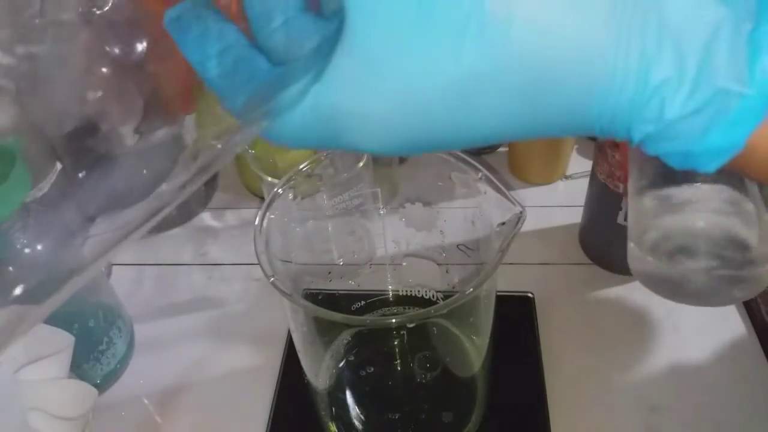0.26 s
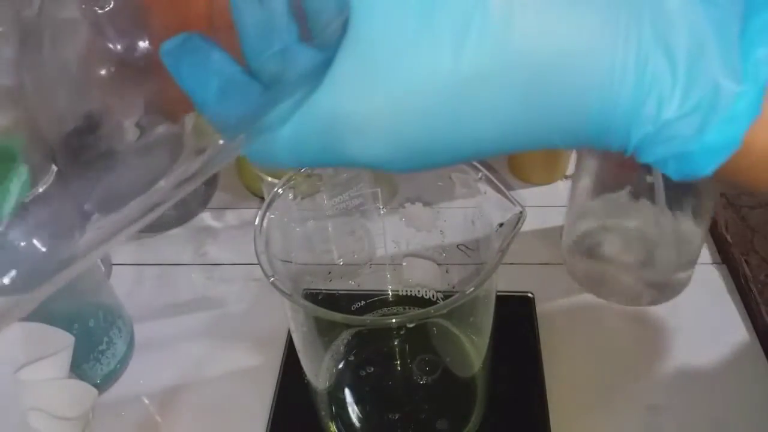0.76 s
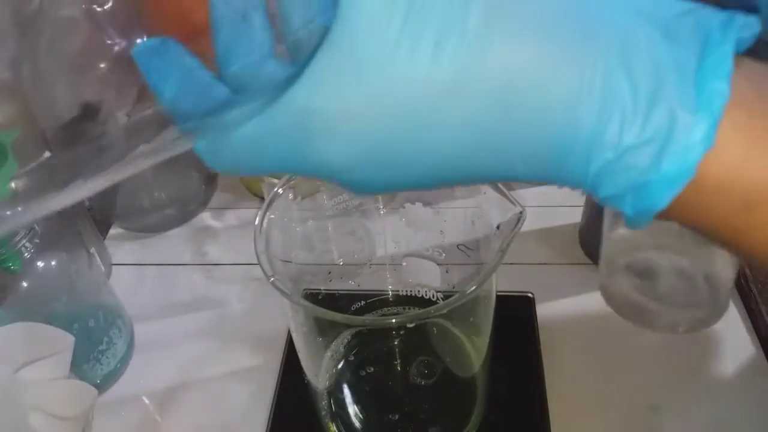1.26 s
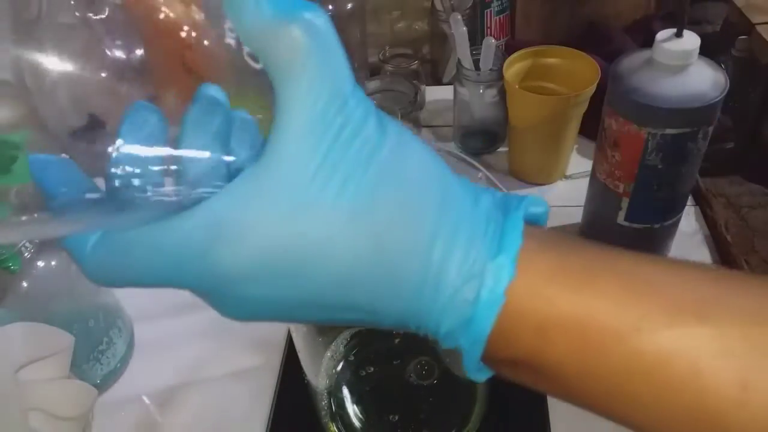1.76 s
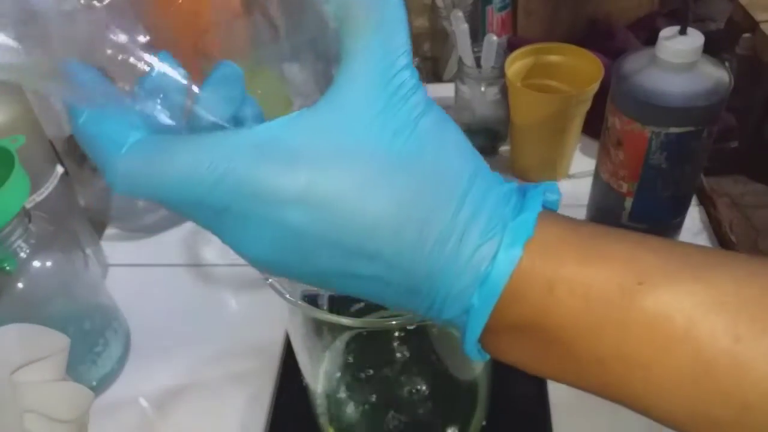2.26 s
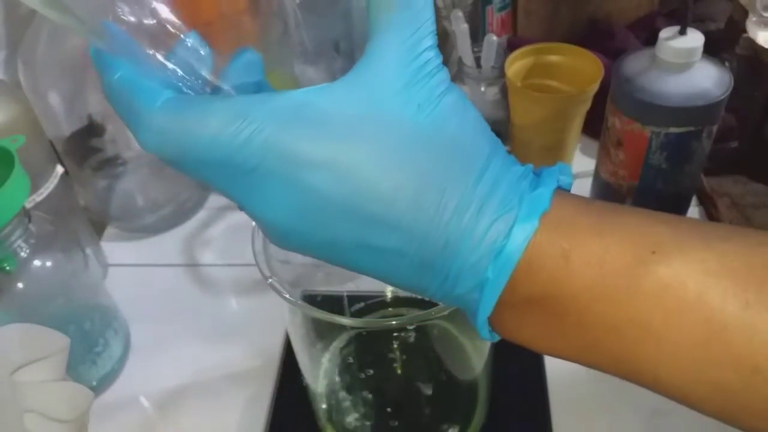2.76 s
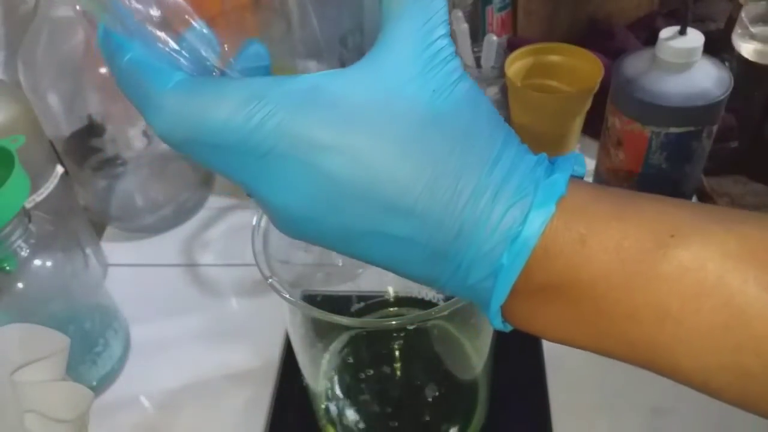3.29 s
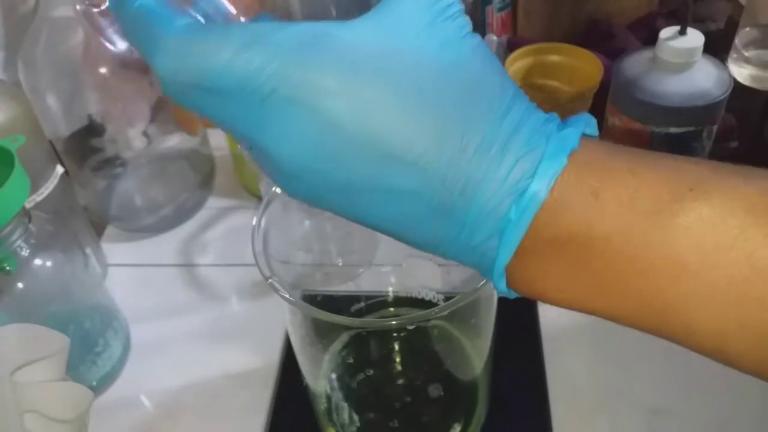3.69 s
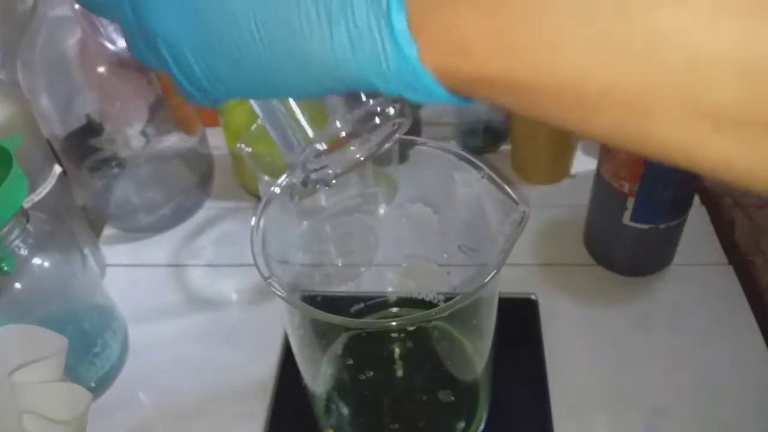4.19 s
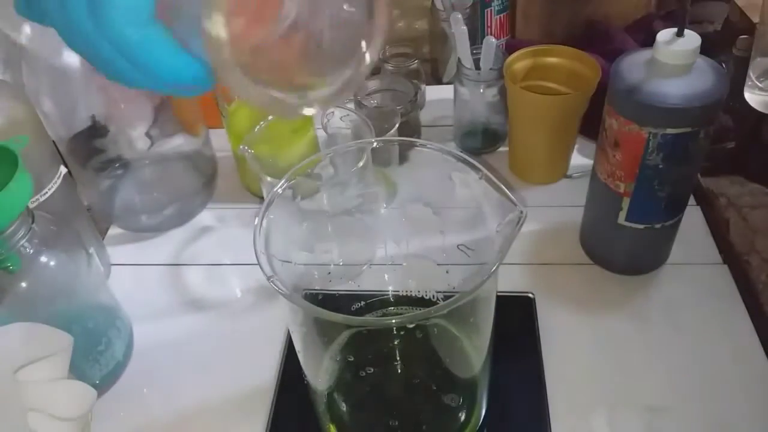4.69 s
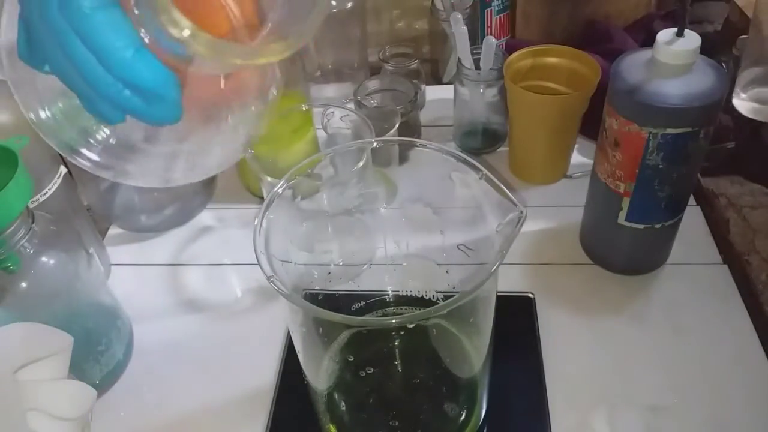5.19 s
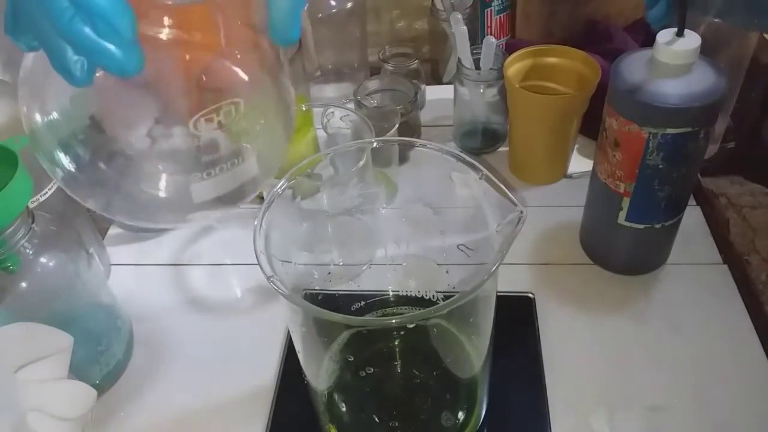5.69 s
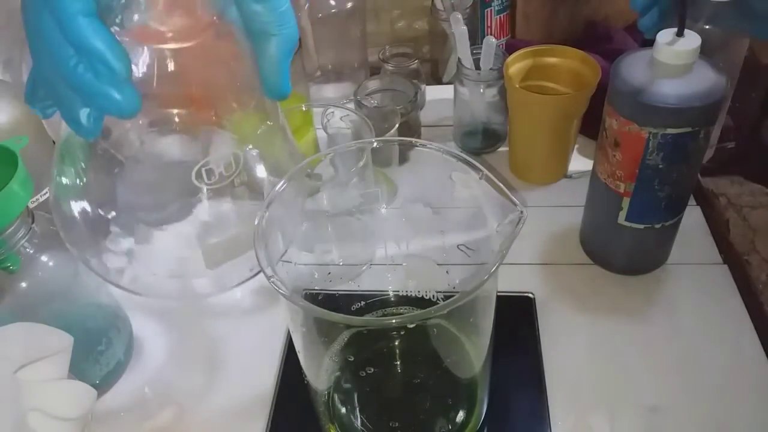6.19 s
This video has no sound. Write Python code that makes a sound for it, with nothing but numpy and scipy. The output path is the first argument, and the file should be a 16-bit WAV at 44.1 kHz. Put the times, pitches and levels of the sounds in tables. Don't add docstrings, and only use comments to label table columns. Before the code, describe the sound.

Glassy swirling clatter with wet slaps, a short splash of poured liquid, sparse drips, then a glass flask knocks down with a ringing rattle.

```python
import sys
import numpy as np
from scipy import signal
from scipy.fft import rfft, irfft, next_fast_len
from scipy.io import wavfile
from scipy.ndimage import map_coordinates

SR = 44100
rng = np.random.default_rng(int(sys.argv[2]) if len(sys.argv) > 2 else 0)


def generate_wav(sig):
    pcm = np.round(np.clip(np.atleast_2d(sig).T, -1, 1) * 32767).astype(np.int16)
    wavfile.write(sys.argv[1], SR, pcm)


def rack_gain(trim_db):
    fader = np.asarray(trim_db, float)
    return 10 ** (fader / 20)


N = 284445


def unit(x):
    return x / np.sqrt(np.mean(x ** 2) + 1e-20)


def along(points, hz):
    f, v = np.transpose(points)
    return np.interp(np.log(hz + 1), np.log(f + 1), v)


def curves(rows):
    s, *cols = np.transpose(rows)
    return [np.interp(np.arange(N) / SR, s, c) for c in cols]


def wobble(rate, count=N):
    knots = rng.standard_normal(int(count * rate / SR) + 4)
    return map_coordinates(knots, [np.arange(count) * rate / SR])


def hiss(gain, count=N, gate=1, clicks=0):
    m = next_fast_len(count)
    source = rng.standard_normal(count) * gate + clicks
    spectrum = rfft(source, m) * gain(np.fft.rfftfreq(m, 1 / SR))
    return unit(irfft(spectrum, m)[:count])


def band(hz, width, count=N):
    return hiss(lambda f: np.exp(-((f - hz) / width) ** 2), count=count)


def sine(hz, t):
    return np.sin(2 * np.pi * hz * t)


def sweep(hz):
    return np.sin(2 * np.pi * np.cumsum(hz) / SR)


def fade(t, rise, t60):
    return (1 - np.exp(-t / max(rise, 1e-4))) * rack_gain(-60 * t / max(t60, .005))


def add(track, s, x):
    k = round(s * SR)
    x = x[max(-k, 0):N - k]
    track[max(k, 0):][:len(x)] += x


def ring(pitches, modes, t, stop, rough):
    whole = len(t)
    t = t[t < stop + .04]
    tone = np.zeros(len(t))
    for hz, (db, t60) in zip(pitches, modes):
        flutter = wobble(49.4, count=len(t)) + 0.56 * wobble(279, count=len(t))
        shake = 1 + rough * np.sqrt(hz / 3000) * flutter
        tone += rack_gain(db - 60 * t / t60) * shake * np.sin(2 * np.pi * (hz * t + rng.random()))
    mute = rack_gain(-60 * np.maximum(t - stop, 0) / 0.026)
    return np.pad(tone * mute, (0, whole - len(t)))


def echoes(x, decay):
    hz, t, z = signal.stft(rng.standard_normal(SR // 2), SR, nperseg=256)
    dying = z * rack_gain(-60 * t / along(decay, hz)[:, None])
    tail = signal.istft(dying, SR, nperseg=256)[1]
    return signal.fftconvolve(np.pad(x, (150, 0)), tail / np.linalg.norm(tail))[:N]


# start in seconds, length in seconds, level in dB, bounces in Hz.
ROD_CHATTER = [
    (-.05, 0.038, -10, 446),
    (0.21, 0.029, -11.5, 437),
    (0.478, 0.036, -11.5, 439.3),
    (0.748, 0.024, -11.5, 434.7),
    (0.991, 0.027, -11.5, 436.4),
]
# frequency in Hz, density in dB per Hz.
BUZZ_COLOUR = [(290, -58), (500, -27.5), (1280, -19.5), (2360, -9.5), (2610, -10.5), (3250, -12.5),
               (4800, -3), (7980, -5), (9360, -19.5), (11800, -4.5), (16000, -18.5)]
# frequency in Hz, width in Hz, boost in dB.
WALL_MODES = [(1331, 90, 5.5), (2620, 120, 9), (4400, 200, 5), (5040, 200, 5.5), (6020, 250, 4.5),
              (7045, 190, 4), (7800, 280, 5.5)]


def rod_chatter():
    out, t = np.zeros(N), np.arange(SR // 5) / SR

    def colour(f):
        return rack_gain(along(BUZZ_COLOUR, f))

    def glass(f):
        return 1 + sum(rack_gain(g) * 1j * f * w / (c * c - f * f + 1j * f * w) for c, w, g in WALL_MODES)

    for s, length, db, hz in ROD_CHATTER:
        since = (t * hz + 0.066 * wobble(60, count=len(t))) % 1 / hz
        bounce = .4 + np.exp(-since / .0007)
        contacts = np.diff(since, prepend=0) < 0
        click = 2 * (t == 0) + rng.standard_normal(len(t)) * np.exp(-t / .0012)
        clicks = 2.2 * signal.fftconvolve(contacts, click)[:len(t)]
        shape = (1 - np.exp(-(t / 0.011) ** 3.0)) * rack_gain(-60 * np.maximum(t - length, 0) / 0.047)
        buzz = shape * hiss(lambda f: colour(f) * glass(f), count=len(t), gate=bounce, clicks=clicks)
        tail = rack_gain(2.5) * fade(t, length, 0.17) * np.minimum(t / length, 1)
        add(out, s, rack_gain(db) * (buzz + tail * hiss(colour, count=len(t))))
    return out


# start in seconds, level in dB of the 1.3 kHz, 2.6 kHz, 4-5 kHz
# and 7 kHz-and-up families, share of full ring life.
BEAKER_RINGS = [(-.02, -42, -25.5, -23, -19.5, 1.03), (0.119, -32.5, -22.5, -23, -33, 0.39),
                (.164, -38, -42, -53, -50, 0.6), (0.236, -25, -18, -14.5, -18.5, 1.07),
                (.396, -35, -49, -53, -42, 1.1), (0.434, -42, -46, -53, -50, 0.72),
                (.502, -39.5, -42, -63, -31, 1.3), (.65, -40, -45, -55, -50, 0.29),
                (0.706, -40, -45.5, -55, -50, 0.47), (.778, -38, -25.5, -21, -19.5, 1.08),
                (0.896, -40, -42, -55, -51, 0.34), (.955, -42.5, -42.5, -55, -49, 0.36),
                (1.01, -25.5, -25.5, -14.5, -14.5, 1.11), (1.14, -40.5, -40, -54.5, -49.5, 0.41)]
BEAKER_HZ = [1324, 1588, 2620, 2650, 4300, 4400, 4452, 4600, 5040, 5206, 6790, 6900, 7045, 7870, 10090,
             11000, 11950, 13480, 14130, 14850]
BEAKER_FAMILY = [0, 0, 1, 1, 2, 2, 2, 2, 2, 2, 3, 3, 3, 3, 3, 3, 3, 3, 3, 3]
# level in dB, t60 in seconds.
BEAKER_MODES = [(-2, 0.64), (-13.5, 0.51), (2.5, 0.51), (-0.5, 0.14), (1, 0.12), (-3, 0.25), (-3.5, 0.21),
                (-9, 0.51), (2, 0.24), (-29, .2), (-6.5, 0.42), (-11, 0.19), (2.5, 0.22), (-20, 0.15),
                (-20, 0.3), (-18.5, 0.12), (-19, 0.25), (-13, 0.21), (-18, 0.24), (-13, 0.24)]


def beaker_ring():
    out, t = np.zeros(N), np.arange(SR // 5) / SR
    ticks, sloshes, knocks = WALL_SLAPS
    heavy = sloshes + knocks + ROD_CHATTER
    low, high = slice(0, 4), slice(4, None)
    for s, *family_db, share in BEAKER_RINGS:
        modes = []
        for (db, t60), k in zip(BEAKER_MODES, BEAKER_FAMILY):
            modes.append((db + family_db[k] + rng.normal(0, 0.37), t60 * share))
        for part, hits, rough in [(low, heavy, .55), (high, heavy + ticks, .7)]:
            stop = min([hit[0] for hit in hits if hit[0] > s + .005], default=N / SR) - .004
            tone = ring(BEAKER_HZ[part], modes[part], t, stop - s, rough)
            add(out, s, tone * (1 - np.exp(-t / 0.007)))
    return out


# time in seconds, level in dB.
AIR_LEVEL = [(0, -54), (1.2, -56), (1.8, -58.5), (5.8, -60), (6.45, -55.5)]
# frequency in Hz, density in dB.
AIR_COLOUR = [(100, -25), (170, 5.5), (205, -3.5), (355, -2), (3230, -22.5), (3830, -13), (5920, -15.5),
              (6630, -12), (8470, -22), (9310, -55), (11000, -13), (15500, -29)]


def room_air():
    return rack_gain(curves(AIR_LEVEL)[0] + 0.27 * wobble(5.5)) * hiss(lambda f: rack_gain(along(AIR_COLOUR, f)))


# frequency in Hz, density in dB per Hz.
RUMBLE_COLOUR = [(25, -58), (38, -23), (55, -6), (90, 3), (150, -7), (190, -32.5)]


def traffic_rumble():
    return rack_gain(-51 + 0.38 * wobble(3.88)) * hiss(lambda f: rack_gain(along(RUMBLE_COLOUR, f)))


# centre in Hz, width in Hz, level in dB.
INSECT_BANDS = [(6686, 100, -58), (6550, 340, -59.5), (8110, 500, -58), (11000, 720, -65.5),
                (7500, 650, -65)]
# time in seconds, level in dB.
NEAR_SONG = [(1.39, -61), (1.762, -58.5), (1.95, -77), (2.4, -67.5), (2.78, -58.5), (3.45, -65),
             (3.97, -70), (4.45, -61), (5.9, -64)]


def insects():
    out = np.zeros(N)
    near_db = curves(NEAR_SONG)[0]
    swell = [near_db - near_db.mean(), 0, 0, 0, 0]
    for (hz, width, db), more_db in zip(INSECT_BANDS, swell):
        out += rack_gain(db + more_db + 1.5 * wobble(40)) * band(hz, width)
    return out


def refrigerator():
    hum_hz, hum_db = 120, -49
    phase = 2 * np.pi * hum_hz * np.arange(N) / SR + 0.36 * wobble(6.2)
    return rack_gain(hum_db + 1.8 * wobble(6)) * np.sin(phase)


# time in seconds, firing rate in Hz, level in dB.
ENGINE_REVS = [(0, 40.55, -65), (.6, 45.95, -54), (1.3, 54.03, -54), (1.95, 62.2, -45.5),
               (2.4, 65.86, -47.5), (3.1, 73, -55), (3.7, 79.6, -47), (4.05, 82.55, -48), (4.4, 76.9, -59),
               (4.8, 68.54, -57.5), (5.3, 59.4, -58), (6.45, 59, -68)]


def far_engine():
    hz, db = curves(ENGINE_REVS)
    phase = 2 * np.pi * np.cumsum(hz) / SR + .5 * wobble(7)
    return rack_gain(db) * rack_gain(2 + 3 * wobble(12)) * np.sin(phase)


# start in seconds, level in dB, brightness in dB.
WALL_SLAPS = [
    [(.067, -19, 2), (.074, -8, 2.5), (.161, -16, 3), (.942, -10, 6), (.12, -29, 12.5), (.185, -30, -13),
     (.338, -15, -3), (.613, -22, -4.5), (.861, -21, 3), (1.114, -6, 1)],
    [(.082, -7.5, -0.5), (.353, -7, 1), (.626, -6, 2), (.875, -4, 5.5), (.948, -13, -9), (1.123, -7, -1)],
    [(.092, -9, 0), (.16, -20, 8.5), (.364, -11, 0), (.429, -16, -0.5), (.643, -12, 2.1), (.7, -15, 0.5),
     (.887, -10.5, -2), (.942, -11.5, 5), (1.136, -7, 1)],
]
# rise in seconds, t60 in seconds, low knock in dB.
SLAP_KINDS = [
    (0.00066, .018, -38),
    (0.0062, 0.062, -22.5),
    (0.00015, 0.051, -6),
]
# frequency in Hz, density in dB per Hz.
WET_COLOUR = [(470, -43), (800, -29.5), (2440, -6.5), (2950, -14.5), (3740, -2), (5050, -7), (6020, -3.5),
              (8770, -17), (13400, -10), (16000, -23)]
# frequency in Hz, density in dB per Hz.
KNOCK_COLOUR = [(100, -64), (200, -15), (400, -3), (800, 1.5), (2000, 0.5), (3000, 0), (5000, -12)]


def wall_slaps():
    out, t = np.zeros(N), np.arange(SR // 5) / SR
    for hits, (rise, t60, knock_db) in zip(WALL_SLAPS, SLAP_KINDS):
        for s, db, bright_db in hits:
            tilt = lambda f: bright_db * np.log2(f / 5000 + 0.24)
            wet = hiss(lambda f: rack_gain(along(WET_COLOUR, f) + tilt(f)), count=len(t))
            wet = wet * rack_gain(0.88 * wobble(550, count=len(t)))
            knock = rack_gain(knock_db) * hiss(lambda f: rack_gain(along(KNOCK_COLOUR, f)), count=len(t))
            add(out, s, rack_gain(db) * fade(t, rise, t60) * (wet + knock))
    return out


# start in
# seconds, pitch in Hz, level in dB.
SLOW_GULPS = [(.631, 3700, -16), (.881, 3500, -16), (.949, 3250, -10), (.951, 3400, -15),
              (1.127, 3800, -14), (.433, 3000, -23), (2.018, 3350, -15), (.36, 5900, -18),
              (.068, 6050, -19), (.087, 3700, -17), (.085, 6000, -17), (.097, 2050, -20),
              (.887, 1950, -19)]
# start in seconds, pitch in Hz, level in dB, t60 in seconds.
GUSH_BUBBLES = [(2.024, 800, -25, 0.049), (2.037, 5000, -19.5, 0.022), (2.037, 1620, -27.5, 0.063),
                (2.041, 3370, -17.5, 0.044), (2.051, 1060, -16.5, 0.036), (2.056, 2216, -24.5, 0.039),
                (2.088, 3320, -15.5, 0.039), (2.09, 2780, -23, 0.038), (2.088, 1586, -24, 0.02),
                (2.09, 4180, -24, 0.029), (2.17, 3660, -46, 0.019), (2.215, 2106, -26.5, 0.048),
                (2.218, 3020, -37, 0.055), (2.214, 1540, -30, 0.03), (2.215, 2857, -30.5, 0.067),
                (2.215, 4410, -42.5, 0.11), (2.262, 2060, -34, 0.048), (2.332, 2090, -39, 0.05),
                (2.024, 1050, -34.5, .03), (2.05, 700, -32, .04)]
# start in seconds, pitch in Hz, level in dB, t60 in seconds.
THIN_DRIPS = [(2.554, 1333, -57, 0.07), (2.583, 1390, -43.5, 0.053), (2.585, 3550, -52, 0.2),
              (2.2, 4900, -59, 0.33), (2.639, 1667, -39.5, 0.22), (2.637, 2100, -45, .05),
              (2.781, 2770, -35.5, 0.073), (2.836, 2700, -42, .046), (2.902, 2346, -43.5, 0.13),
              (2.901, 2747, -44, 0.13), (2.956, 2217, -29.5, 0.062), (2.96, 2734, -39.5, 0.11),
              (2.965, 2330, -42.5, 0.19), (2.962, 4890, -42.5, 0.22), (3.038, 2396, -48, 0.19),
              (3.125, 2120, -57, .07), (2.985, 3500, -52, .06), (3.09, 2800, -56, .06),
              (2.905, 1600, -54, .05), (3.2, 3400, -54, .05), (3.152, 2176, -47, 0.069),
              (3.2, 5900, -54, .1), (3.04, 5900, -56, 0.16), (2.82, 4130, -58, .1), (3, 3850, -48, 0.074),
              (3.195, 4800, -50, 0.084), (3.193, 2745, -42, 0.1), (3.195, 2900, -49, 0.055),
              (3.251, 3900, -51, 0.096), (3.3, 4250, -56, 0.1), (3.41, 1370, -61, 0.29),
              (3.455, 1890, -64, .15), (2.86, 3100, -56, .1), (4.1, 3670, -40.5, 0.13),
              (4.559, 1703, -55.5, 0.089)]
# rise in seconds, pitch gain as a share.
POCKET_KINDS = [
    (.001, 0.032),
    (.002, 0.017),
    (.003, .017),
]


def bubbles():
    out, t = np.zeros(N), np.arange(SR // 3) / SR
    gulps = [gulp + (0.038,) for gulp in SLOW_GULPS]
    for rows, (rise, gain) in zip((GUSH_BUBBLES, THIN_DRIPS, gulps), POCKET_KINDS):
        for s, hz, db, t60 in rows:
            creep = gain * np.minimum(3 * t / t60, 2) - gain / 2
            pitch = hz * (1 + creep + .011 * wobble(150, count=len(t)))
            tone = sweep(pitch) * rack_gain(2.5 * wobble(200, count=len(t)))
            collapse = rack_gain(db + 5.0 - 60 * (t / t60) ** 1.6)
            add(out, s, collapse * fade(t, rise, 1.46 * t60) * tone)
    return out


# start in seconds, end in seconds, centre in Hz, width
# in Hz, level in dB.
FAINT_NOISES = [(1.38, 1.593, 535, 14, -59), (1.36, 1.85, 4170, 90, -61), (1.99, 2.384, 350, 420, -53),
                (2.24, 2.44, 4600, 50, -62), (2.38, 2.58, 4510, 50, -62), (3.7, 4.48, 356, 200, -60.5),
                (4.7, 5.94, 666.7, 125, -66.5), (5.4, 5.562, 794, 55, -53.5), (6.2, 6.34, 300, 150, -45),
                (2.943, 3.1, 4700, 350, -55), (2.5, 2.79, 804, 36, -61.5), (3.36, 3.5, 5050, 350, -59),
                (2.52, 2.73, 4310, 45, -62), (2.0, 2.3, 160, 40, -52), (5.635, 5.67, 7000, 500, -55),
                (2.28, 2.4, 1000, 350, -56), (3.0, 3.2, 350, 80, -60), (.8, 1.25, 140, 30, -56)]


def faint_noises():
    out = np.zeros(N)
    for s, end, hz, width, db in FAINT_NOISES:
        swell = np.sqrt(np.hanning(round((end - s) * SR)))
        level = rack_gain(db + 3.0 * wobble(35.0, count=len(swell)))
        add(out, s, level * swell * band(hz, width, count=len(swell)))
    return out


# start in seconds, centre in Hz, level in dB, t60 in seconds.
DROP_SPRAY = [(2.014, 6000, -31.5, 0.093), (2.038, 4330, -24, 0.1), (2.03, 620, -29.5, 0.092),
              (2.052, 1780, -31.5, 0.12), (2.084, 7500, -31, 0.087), (2.088, 4480, -27, 0.044),
              (2.204, 7740, -31, 0.08), (2.214, 2680, -34, 0.092), (2.225, 7500, -21.5, 0.042),
              (2.262, 3280, -50, 0.23), (2.313, 11200, -38.5, 0.055), (2.329, 4900, -33, 0.089),
              (2.357, 14500, -41.5, 0.06), (2.585, 3600, -51, 0.18), (2.641, 9000, -55, 0.15),
              (2.662, 10000, -43, 0.059), (2.129, 6840, -34.5, 0.055), (2.836, 7200, -41.5, 0.077),
              (2.82, 3800, -54, 0.21), (2.9, 1620, -51.5, 0.12), (2.958, 3750, -43.5, 0.15),
              (3.039, 5950, -52, 0.15), (3.194, 4130, -45, 0.22), (4.1, 3450, -48, 0.11),
              (4.559, 3020, -51.5, 0.06), (2.212, 1100, -41, 0.092), (2.216, 2000, -38, 0.076),
              (2.262, 1910, -38.5, .07), (2.09, 984, -38.5, 0.051), (2.062, 3000, -34, .1),
              (2.79, 2660, -50.5, 0.23), (2.96, 2370, -43, 0.25), (3.04, 2600, -47.5, 0.13),
              (2.64, 1580, -46, .15), (3.255, 4500, -50, 0.17), (4.559, 1300, -52, 0.073)]


def spray():
    out, t = np.zeros(N), np.arange(SR // 3) / SR
    for s, hz, db, t60 in DROP_SPRAY:
        bell = lambda f: np.exp(-(np.log2(f / hz + 1e-9) / 0.25) ** 2)
        burst = hiss(lambda f: 0.44 * rack_gain(along(WET_COLOUR, f)) + bell(f), count=len(t))
        add(out, s, rack_gain(db + 2.0 * wobble(520, count=len(t))) * fade(t, 0.00057, t60) * burst)
        for late, tone, size in rng.random((9, 3)):
            tiny_hz = min(hz, 4500) * 2 ** (1.375 * tone - .9)
            tiny = fade(t, 0.0012, 60 / tiny_hz) * sine(tiny_hz, t * (1 + 3 * t))
            add(out, s + late ** 2 * t60, rack_gain(db + 1 - 25.0 * size - 14.4 * late) * tiny)
    return out


# start in seconds, end in seconds, low Hz, high Hz, level in dB.
STRAY_DROPLETS = (2.5, 3.35, 2000, 5500, -51)


def droplets():
    out, t = np.zeros(N), np.arange(SR // 3) / SR
    start, end, low_hz, high_hz, drop_db = STRAY_DROPLETS
    for when, tone, size in rng.random((45, 3)):
        hz = low_hz * (high_hz / low_hz) ** tone
        chirp = fade(t, 0.00077, 90 / hz) * sine(hz, t * (1 + t))
        add(out, start + when * (end - start), rack_gain(drop_db - 10 * size) * chirp)
    return out


# start in seconds, level in dB, thud in dB, share of ring life,
# treble in dB.
FLASK_TOUCHES = [
    (5.928, -8, -19, 0.78, 1.5),
    (5.94, -11.5, -6, 0.94, -3.5),
    (5.962, -15, -4.5, 0.87, -13),
    (6.201, -21, -5, 0.63, -2),
    (6.21, -22, -3, 1, -3),
    (6.268, -24.5, -13.5, 0.47, -3),
    (6.28, -30, -21.5, 0.47, -14),
]
# boost in dB near 1.3, 2.1, 2.3, 2.7, 3.2 and 3.5 kHz.
TOUCH_FAVOUR = [(-4, -0.2, -13, -3, -1, 0), (-6, -0.5, -11, 0, 1, 0.5), (0.3, -1, 0.5, 1.5, -1, 1),
                (0, -5, -2, 0.1, -4, -3.5), (-3.5, -1, 5, 1, -3, -3), (-6, -3, 5, -2, -8, -2),
                (-2.5, 9, 7, 5, -4, 5)]
# low edge in Hz, high edge in Hz.
FAVOUR_SPANS = [(1250, 1400), (2000, 2200), (2250, 2400), (2600, 2750), (3100, 3250), (3450, 3650)]
FLASK_HZ = [495, 1040, 1303, 1346, 2040, 2159, 2304, 2336, 2659, 2697, 3122, 3198, 3488, 3620, 4296, 4565,
            4958, 5394, 5700, 7300, 7700]
# level in dB, t60 in seconds.
FLASK_MODES = [(-34, 0.5), (-7.5, 0.059), (-26, 2.6), (-14, 8), (-7, 0.15), (-16, 0.31), (-20.5, 0.83),
               (-10, 0.58), (-11.5, 0.4), (-3.5, 0.29), (-5, 0.16), (-7, 0.29), (-2, 0.29), (-2, 0.13),
               (-11.5, 0.17), (-2, 0.081), (-3, 0.1), (-21.5, 0.089), (-5, 0.091), (3.5, 0.025),
               (-6, 0.046)]
# frequency in Hz, density in dB per Hz.
RATTLE_COLOUR = [(120, -33), (200, -16), (600, -20), (880, -11.5), (1810, -17.5), (2090, -13),
                 (2420, -25.5), (3560, -12.5), (4040, -18), (4600, -14), (5330, -22), (7830, -17.5),
                 (9580, -35), (14300, -24), (16000, -37)]


def flask():
    out, t = np.zeros(N), np.arange(SR // 3) / SR
    for (s, db, thud_db, share, bright_db), favour_db in zip(FLASK_TOUCHES, TOUCH_FAVOUR):
        later = [touch[0] + 0.0087 for touch in FLASK_TOUCHES if touch[0] > s]
        stop = min(later, default=N / SR)
        edge = lambda f: bright_db * np.clip(np.log2(f / 4000 + 1e-9), 0, 1.7)
        rattle = hiss(lambda f: rack_gain(along(RATTLE_COLOUR, f) + edge(f)), count=len(t))
        rattle = rack_gain(-0.5) * rattle * fade(t, 0.00053, 0.08)
        thud = rack_gain(thud_db) * sine(148, t) * fade(t, 0.003, 0.1) * (1 + .5 * wobble(60, count=len(t)))
        modes = []
        for hz, (level, life) in zip(FLASK_HZ, FLASK_MODES):
            favour = sum(more * (low < hz < high) for more, (low, high) in zip(favour_db, FAVOUR_SPANS))
            modes.append((level + edge(hz) + favour + rng.normal(0, 1), life * share))
        tone = (1 - np.exp(-t / 0.0029)) * ring(FLASK_HZ, modes, t, stop - s, rough=0.2)
        add(out, s, rack_gain(db) * (rattle + thud + tone))
    return out


# frequency in Hz, t60 in seconds.
HOLLOW_DECAY = [(300, 0.14), (2000, 0.078), (6000, 0.017), (12000, 0.097)]
# frequency in Hz, t60 in seconds.
ROOM_DECAY = [(200, 0.49), (2000, 0.19), (10000, 0.15)]


def scene():
    liquid = bubbles() + spray() + droplets()
    near = rod_chatter() + beaker_ring() + wall_slaps() + flask()
    near += liquid + rack_gain(-5) * echoes(liquid, HOLLOW_DECAY)
    indoors = room_air() + refrigerator()
    outside = traffic_rumble() + insects() + far_engine() + faint_noises()
    return (near + rack_gain(-17.5) * echoes(near, ROOM_DECAY) + indoors + outside)[None]


def top_cut(x):
    return signal.sosfilt(signal.butter(12, 16630, fs=SR, output="sos"), x)


def record(dry):
    clipped = dry / (1 + np.abs(dry) ** 10) ** (1 / 10)
    hz = np.fft.rfftfreq(N, 1 / SR)
    passed = 1 / (1 + (hz / 15900) ** 80) / (1 + (36 / (hz + 1)) ** 4)
    finished = irfft(rfft(clipped) * passed, N)
    return top_cut(finished)


dry = scene()
out = record(dry)
generate_wav(out)
```